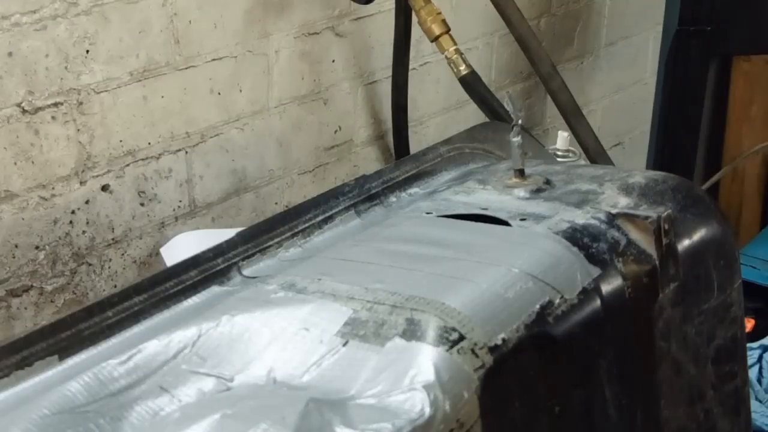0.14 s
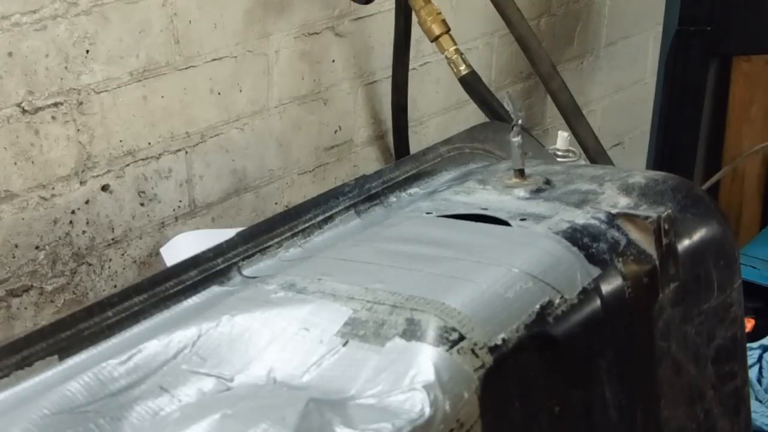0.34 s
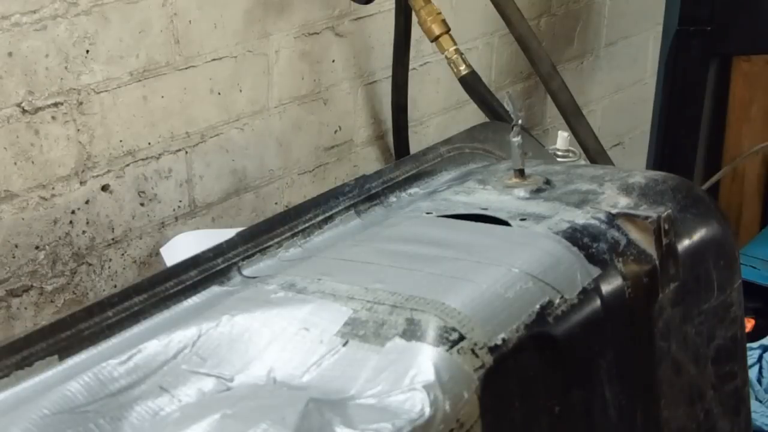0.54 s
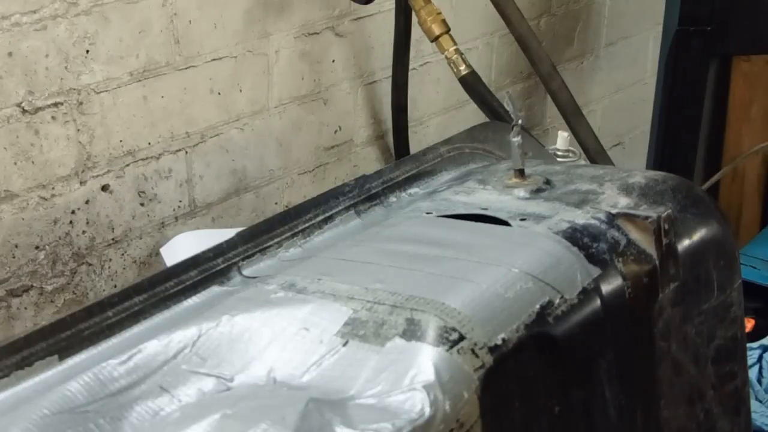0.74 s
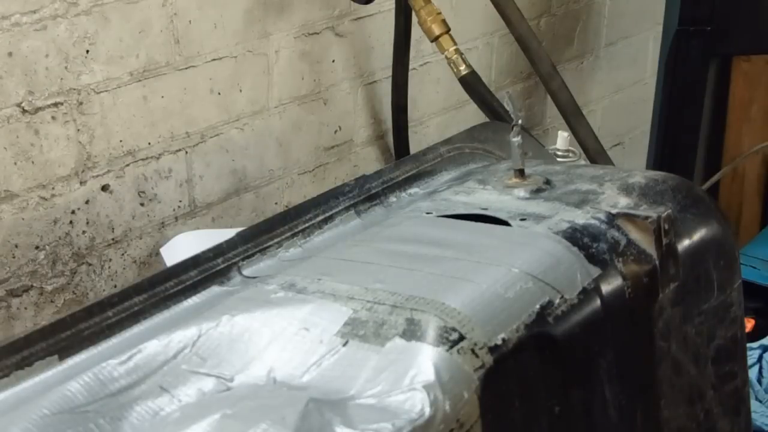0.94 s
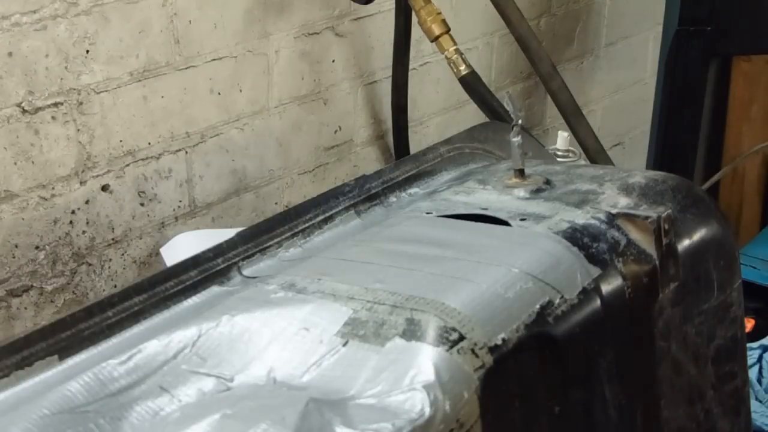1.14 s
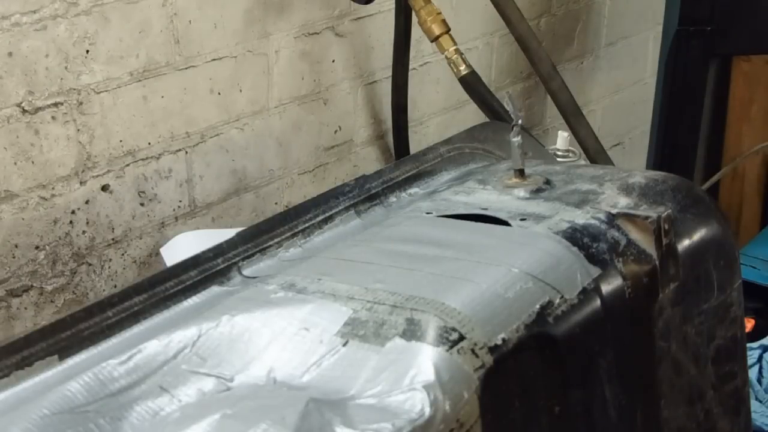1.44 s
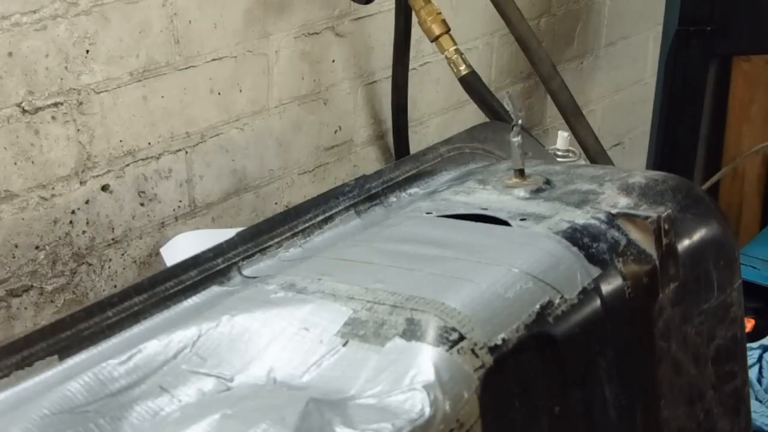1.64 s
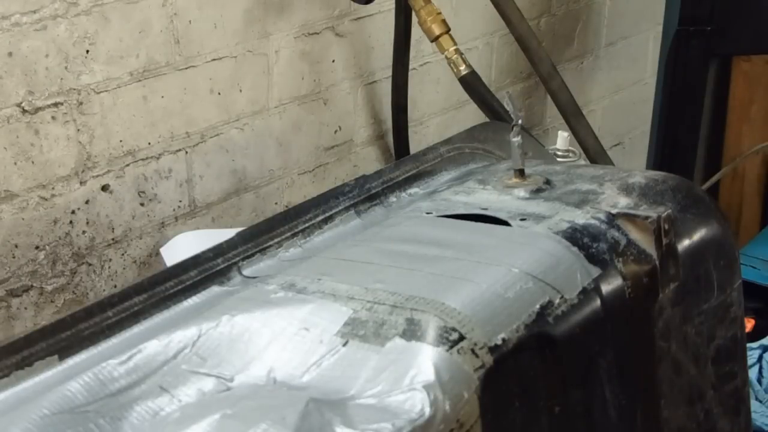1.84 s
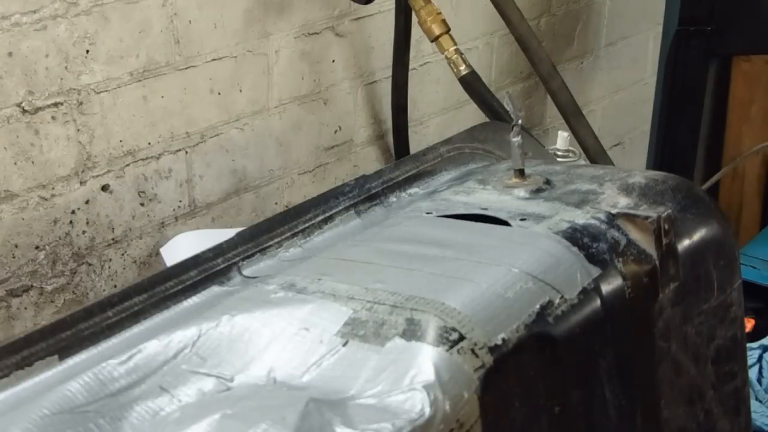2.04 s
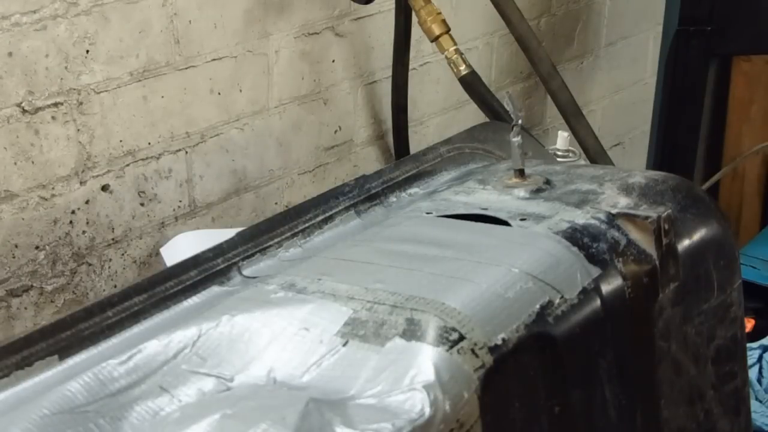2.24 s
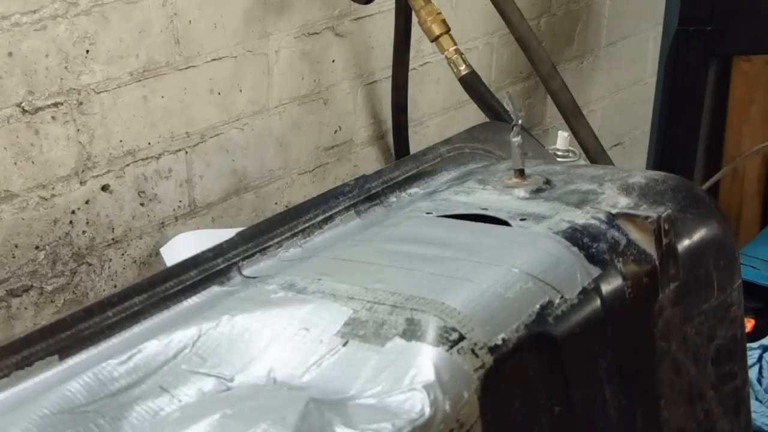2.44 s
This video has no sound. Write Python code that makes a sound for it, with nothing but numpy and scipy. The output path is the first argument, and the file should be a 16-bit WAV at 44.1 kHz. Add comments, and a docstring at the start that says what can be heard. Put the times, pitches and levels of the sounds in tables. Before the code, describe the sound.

Short harsh rips of duct tape, first loud and rapid, then dwindling to sparse small crackles

```python
"""Duct tape is ripped off its roll in short tugs over a steel tank in a small brick workshop.
Each tug is a run of uneven slips of the glue plus fine hiss, coloured by the freed strip.
The tape snaps in single large slips as it comes taut, and in four tugs the strip drums with a gliding note.
The tank rings faintly, the walls add near echoes and a short tail, and a faint steady noise lies below."""
import sys
import numpy as np
from scipy import signal
from scipy.fft import rfft, irfft
from scipy.io import wavfile

SR = 44100
rng = np.random.default_rng(int(sys.argv[2]) if len(sys.argv) > 2 else 0)


def master(y):
    """Save y as 16-bit WAV."""
    cut = np.clip(np.atleast_2d(y).T, -1, 1)
    pcm = np.round(cut * 32767)  # scale
    wavfile.write(sys.argv[1], SR, pcm.astype(np.int16))


N = 114660  # length in samples

# Tugs on the tape: start t/s, full-speed t/s, stop t/s, level at full speed/dB, swell up to it/dB,
# typical slip rate/(1/s), strip resonance f/Hz, its boost/dB, bass boost/dB, treble boost/dB
TUGS = [(-.12, -0.094, -.02, -21.5, 1, 405, 600, 17, -2.5, 2),
        (.216, 0.253, .296, -17, 11.5, 520, 555, 10, -1.5, 3),
        (.474, 0.519, .561, -16.5, 13, 467, 766, 3.5, 4, 0),
        (0.767, 0.793, .811, -23, 16, 560, 574, 8.5, 1, 1.5),
        (1.026, 1.039, 1.078, -22, 10, 247, 1590, 2, 1, 4),
        (1.333, 1.352, 1.360, -36.5, 4, 360, 460, 8, 19, 9),
        (1.682, 1.684, 1.712, -40, 11, 484, 523, 4, 6.5, -8.5),
        (2.297, 2.347, 2.360, -27, 20, 335, 3950, 5.5, -18, 0)]
# Single snaps of the tape: t/s, level/dB, strip resonance f/Hz, its boost/dB, treble boost/dB
SNAPS = [(0.045, -46, 3000, 1, 0), (0.2096, -32.5, 3500, 7, 3), (0.2183, -26.5, 2800, -1, 14),
         (.282, -18, 3730, 34, 0), (0.4688, -18.5, 2860, 19.5, -1), (0.4878, -35, 3000, -6, -12),
         (.495, -14, 3140, 1, -19), (.5577, -25, 3500, -7, 22), (0.757, -28, 5440, 3, 10),
         (.770, -29.5, 3470, 4, -15), (1.0177, -31.5, 3200, 1, 8), (1.025, -34, 3500, 8, 6),
         (1.0298, -29, 3500, 10, 5), (1.053, -20.5, 3800, 0, -19), (1.0678, -18.5, 3770, 15.5, 15.5),
         (1.3313, -30, 3040, 6, 2), (1.347, -24, 4250, 3, 3), (1.402, -33.5, 3500, -13, 7),
         (1.566, -43, 3700, 9, 9.5), (1.665, -50, 4800, 15, 5), (1.6823, -38, 1200, 16, 1),
         (1.6969, -24, 3400, 3, -19), (1.7049, -36, 3200, -3, -30), (1.7085, -47, 3030, 11, -10),
         (2.25, -45.5, 990, 23, -12), (2.258, -53, 3700, 7, -3), (2.2893, -44, 3500, -20, 0),
         (2.296, -44, 4000, -8, 4), (2.320, -32.5, 3900, 8, 5), (2.342, -21, 3450, 6, 5.5),
         (2.3581, -26.5, 4230, 8, 20), (2.476, -34.5, 2580, 24, 3), (2.4869, -32.5, 2650, -5, -4)]
# Drumming of the freed strip like a loose skin: start t/s, stop t/s, first f/Hz, last f/Hz, level/dB
STRIP_DRUMS = [(.235, 0.302, 615, 398, -26.5), (0.488, 0.573, 403, 221, -36.5), (.783, .815, 230, 202, -40),
               (1.03, 1.066, 141, 204, -45.5)]
# Colour of the peeling tape: f/Hz, gain/dB
TAPE_COLOUR = [(40, -35), (100, -30), (200, -15.5), (420, -5), (750, -2), (1200, -1.5), (2200, 3.5),
               (3300, 4), (4800, 0), (6700, -4.5), (9400, -12.5), (13000, -21.5), (16000, -26)]
# Ringing notes of the steel tank: f/Hz, level/dB, time to fade by 60 dB t/s
TANK_NOTES = [(435, -39.5, 0.64), (552, -38.5, 0.71), (805, -41.5, 0.49), (1201, -39, 0.77),
              (1341, -37, 0.62), (1838, -30.5, 0.33), (2930, -35.5, .4)]
# Fading of the room's tail: f/Hz, time to fade by 60 dB t/s
ROOM_FADE = [(150, 0.51), (500, 0.37), (1400, 0.48), (3300, 0.46), (7000, 0.46), (14000, 0.39)]
# Colour of the steady background noise: f/Hz, gain/dB
NOISE_COLOUR = [(15, -35), (25, -5), (49, 4), (175, -2.5), (223, -4), (659, -1.5), (840, -3.5),
                (1020, -3.5), (2280, -5), (14800, -20.5), (16000, -33)]

# A tug: fall in level from full speed to stop, unevenness of slip timing and of slip size
SAG_DB, SLIP_JITTER, SLIP_SPREAD_DB = 5, .45, 3
# Fading time and roughness of one slip; level of the fine tearing between slips
SLIP_S, SLIP_NOISE, FIZZ_DB = 0.00068, 0.67, -9.5
SNAP_S, SNAP_NOISE, SNAP_BASS_DB = 0.00041, 0.68, -5.5
# The strip: distance from its resonance where the boost is halved, and the bass and treble corners
STRIP_OCTAVES, BASS_HZ, TREBLE_HZ = 0.24, 343, 6400
DRUM_WIDTH = 0.33  # width of the drum resonance, as a share of its last note
# The room: tail level and build-up time, early echo level and fading time
TAIL_DB, TAIL_ONSET_S, EARLY_DB, EARLY_S = -3.5, 0.0027, -4.5, 0.0072
# Short stereo spread of the treble: level, fading time and lower limit
SPREAD_DB, SPREAD_S, SPREAD_HZ = -9.5, .006, 6700
NOISE_DB = -58.5
LEAD_S = .25  # time computed before the audible start, so earlier sounds can ring on into it
EDGE_HZ = 15850  # upper limit of the whole sound
HZ = np.fft.rfftfreq(4096, 1 / SR)  # frequencies at which the strip's colour is worked out


def amp(db):
    """Turns decibels into a gain."""
    return 10 ** (np.asarray(db) / 20)


def unit(x):
    """Scales a sound to an energy of one."""
    return x / np.sqrt(np.sum(x ** 2) + 1e-20)


def read(points, hz):
    """Reads a table between its points on a log-frequency axis."""
    f, value = np.transpose(points)
    return np.interp(np.log(hz + 1), np.log(f + 1), value)


def add(mix, s, sound):
    """Adds a sound at its time, counted from the end of the lead-in."""
    first = max(round((s + LEAD_S) * SR), 0)
    part = mix[first:][:len(sound)]
    part += sound[:len(part)]


def strip(hz, boost_db, bass_db, treble_db):
    """The taut strip answers a slip with the tape's colour and one broad resonance."""
    octaves_away = np.log2((HZ + 1) / hz)
    db = read(TAPE_COLOUR, HZ) + boost_db / (1 + (octaves_away / STRIP_OCTAVES) ** 2)
    db = db + bass_db / (1 + (HZ / BASS_HZ) ** 2)
    db = db + treble_db * (1 + np.tanh(2 * np.log2((HZ + 1) / TREBLE_HZ))) / 2
    # Minimum phase: the answer never comes before the slip
    log_gain = np.log(amp(np.r_[db, db[-2:0:-1]]))
    spectrum = np.exp(signal.hilbert(log_gain).conj())
    return unit(irfft(spectrum[:len(HZ)]))


def slips(decay_s, roughness, count):
    """Each slip is a sharp release and a quickly dying spray of breaking glue threads."""
    t = np.arange(SR // 100) / SR
    spray = roughness * rng.standard_normal((count, len(t))) * np.exp(-t / decay_s)
    spray[:, 0] += .5  # the sharp release
    return spray / np.linalg.norm(spray, axis=1, keepdims=True)


def pull(start, full, stop, level_db, swell_db, rate, strip_hz, boost_db, bass_db, treble_db):
    """The glue sticks and slips unevenly, swelling as the tug gains speed."""
    bursts = slips(SLIP_S, SLIP_NOISE, count=120)
    gap, size = np.clip(rng.standard_normal((2, len(bursts))), -2, 2)
    waits = np.exp(SLIP_JITTER * gap) / rate
    at = np.r_[0, np.cumsum(waits)[:-1]]
    n = max(round((stop - start) * SR), 2)
    run = np.zeros(n + bursts.shape[1])
    for i, burst, gain in zip((at * SR).astype(int), bursts, amp(SLIP_SPREAD_DB * size)):
        if i < n:
            run[i:i + len(burst)] += gain * burst
    run = unit(run)
    run[:n] += amp(FIZZ_DB) * unit(rng.standard_normal(SR)[:n])
    t = start + np.arange(len(run)) / SR
    effort = amp(level_db + np.interp(t, [start, full, stop], [-swell_db, 0, -SAG_DB]))
    response = strip(strip_hz, boost_db, bass_db, treble_db)
    return signal.fftconvolve(run * np.sqrt(n) * effort, response)


def tank(x):
    """The stuck end of the tape sets the steel ringing in fading pure notes."""
    t = np.arange(SR) / SR
    ring = np.zeros(SR)
    for hz, db, t60 in TANK_NOTES:
        fade = np.exp(-np.log(1000) * t / t60)
        ring += amp(db) * unit(np.sin(2 * np.pi * hz * t) * fade)
    return x + signal.fftconvolve(x, ring)[:len(x)]


def reflections():
    """Near echoes come from bench and wall, with a diffuse tail dying band by band."""
    t = np.arange(SR) / SR
    hz, when, z = signal.stft(rng.standard_normal(SR), SR, nperseg=256)
    fade = np.exp(-np.log(1000) * when / read(ROOM_FADE, hz)[:, None])
    tail = signal.istft(z * fade, SR)[1][:SR]
    tail = unit(tail * (1 - np.exp(-t / TAIL_ONSET_S)))
    # About 4000 scattered echoes per second, none in the first millisecond
    taps = rng.choice([-1., 1.], SR) * (rng.random(SR) < 4000 / SR) * (t > .001)
    early = unit(taps * np.exp(-t / EARLY_S))
    return amp(TAIL_DB) * tail + amp(EARLY_DB) * early


def stereo_spread():
    """A burst of noise dying within milliseconds, used to widen the treble."""
    t = np.arange(SR) / SR
    return unit(rng.standard_normal(SR) * np.exp(-t / SPREAD_S))


def room_tone():
    """Faint steady hiss and rumble, made of random noise shaped by frequency."""
    colour = amp(read(NOISE_COLOUR, np.fft.rfftfreq(N, 1 / SR)))
    noise = irfft(rfft(rng.standard_normal(N)) * colour, N)
    return amp(NOISE_DB) * np.sqrt(N) * unit(noise)


def snap(level_db, hz, boost_db, treble_db):
    """One large slip, with the energy of its level held for 1.7 milliseconds."""
    burst = slips(SNAP_S, SNAP_NOISE, count=1)[0]
    sound = signal.fftconvolve(burst, strip(hz, boost_db, SNAP_BASS_DB, treble_db))
    return amp(level_db) * np.sqrt(0.0017 * SR) * unit(sound)


def drum(start, stop, first_hz, last_hz, level_db):
    """Slips shake the strip's lowest resonance, which glides with length and tension."""
    t = np.arange(SR // 5) / SR
    progress = np.clip(t / (stop - start), 0, 1)
    effort = np.sqrt(abs(np.sin(np.pi * progress)))
    note = first_hz + (last_hz - first_hz) * progress
    turn = np.exp(2j * np.pi * np.cumsum(note) / SR)
    r = np.exp(-np.pi * DRUM_WIDTH * last_hz / SR)
    shake = np.diff(effort * rng.standard_normal(len(t)), prepend=0)
    # Shift the note down to zero, smooth there, then shift back: a resonance that follows the glide
    smooth = signal.lfilter([1], [1, -2 * r, r * r], shake / turn)
    ring = (turn * smooth).real
    return amp(level_db) * np.linalg.norm(effort) * unit(ring)


def scene():
    """Tape, tank and room in the middle, with a short stereo spread in the treble only."""
    lead = round(LEAD_S * SR)
    tape = np.zeros(lead + N)
    for row in TUGS:
        add(tape, row[0], pull(*row))
    for s, *row in SNAPS:
        add(tape, s, snap(*row))
    for row in STRIP_DRUMS:
        add(tape, row[0], drum(*row))
    tape = tank(tape)
    mid = signal.fftconvolve(tape, reflections())[lead:lead + N]
    side = signal.fftconvolve(tape, stereo_spread())[lead:lead + N]
    treble_only = signal.butter(16, SPREAD_HZ, "high", fs=SR, output="sos")
    side = amp(SPREAD_DB) * signal.sosfilt(treble_only, side)
    return tape[lead:] + mid + room_tone() + np.array([side, -side])


def record(dry):
    """Cuts off the highest treble with a steep low-pass filter."""
    low_pass = signal.firwin(511, EDGE_HZ, window=("kaiser", 9), fs=SR)
    return signal.oaconvolve(dry, low_pass[None], "same")


dry = scene()
out = record(dry)
master(out)
```